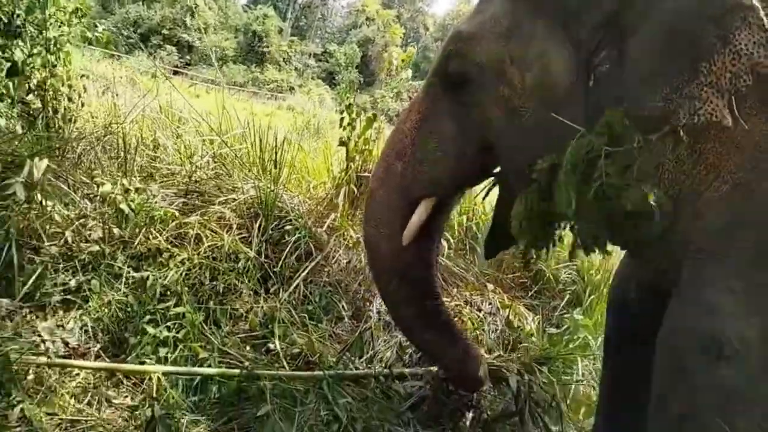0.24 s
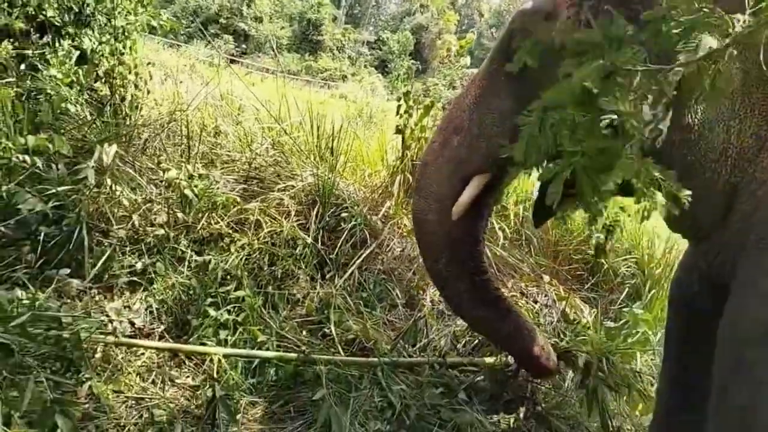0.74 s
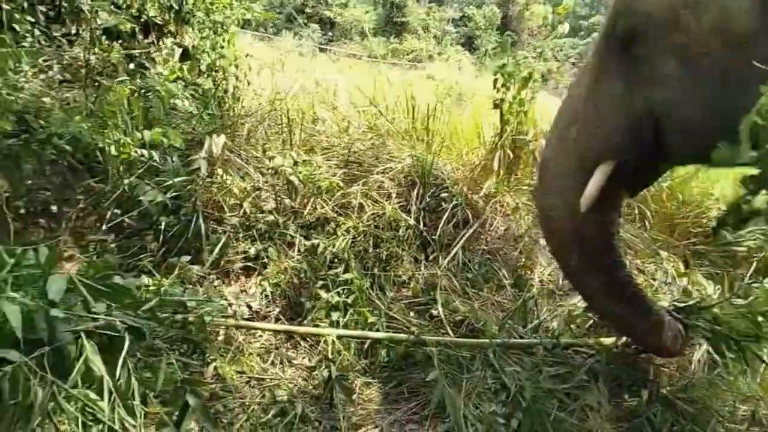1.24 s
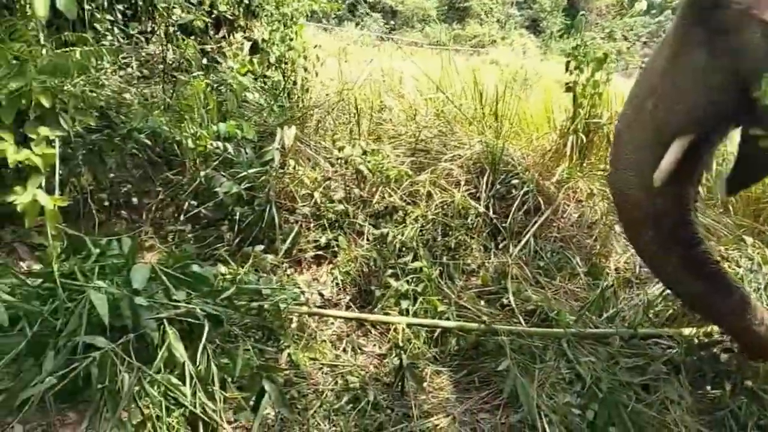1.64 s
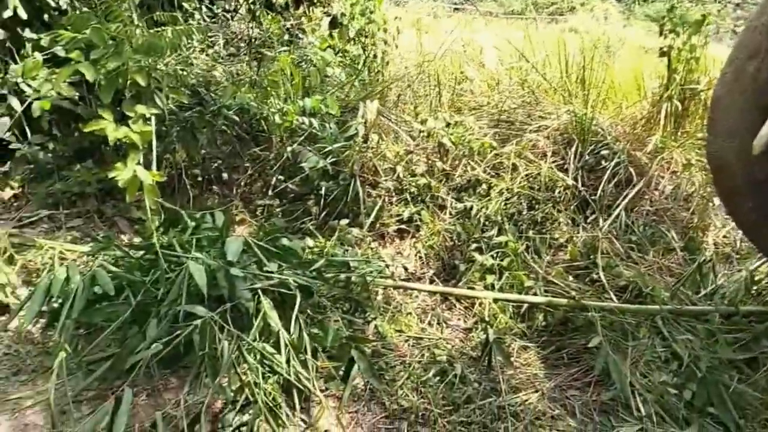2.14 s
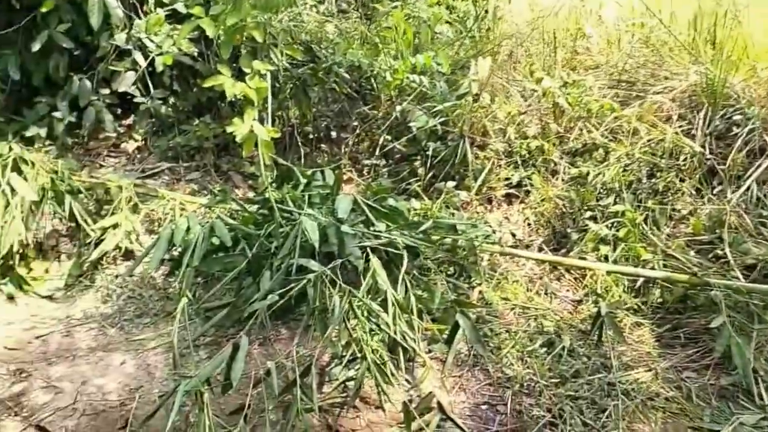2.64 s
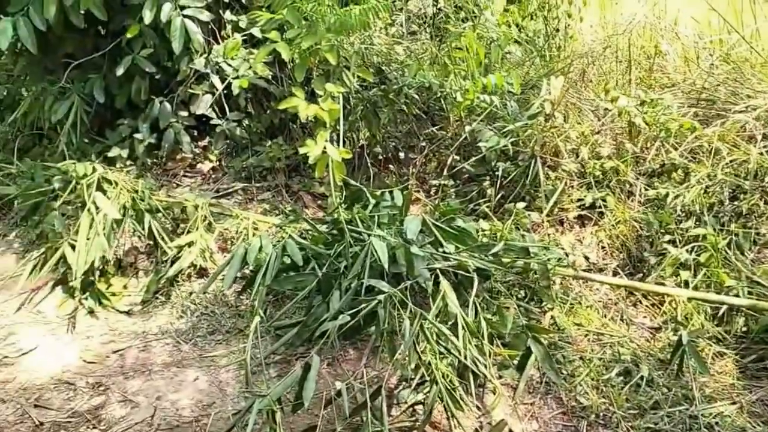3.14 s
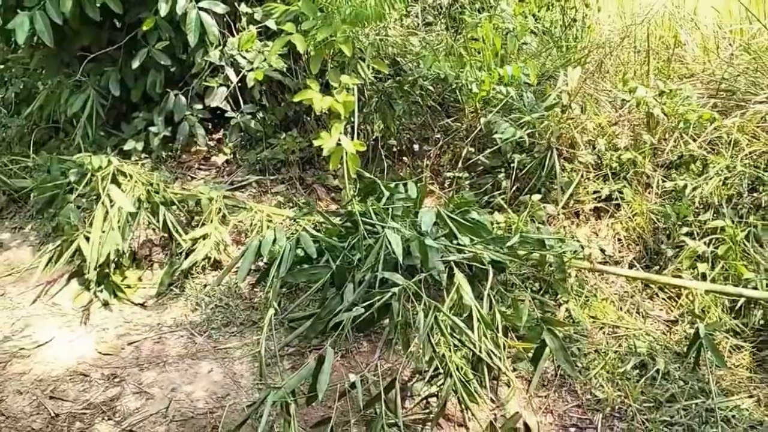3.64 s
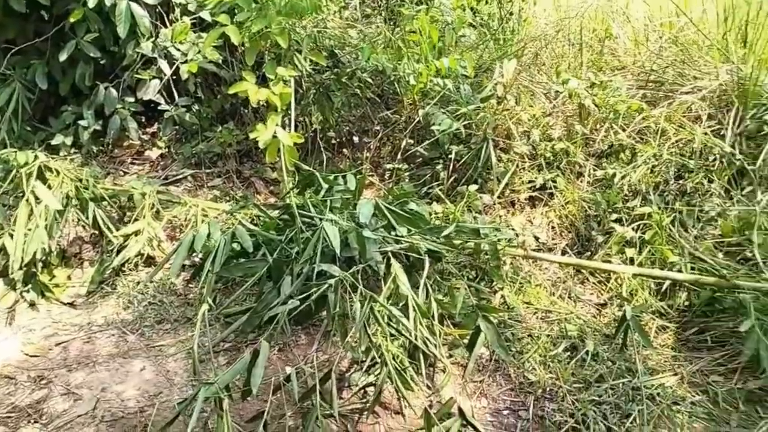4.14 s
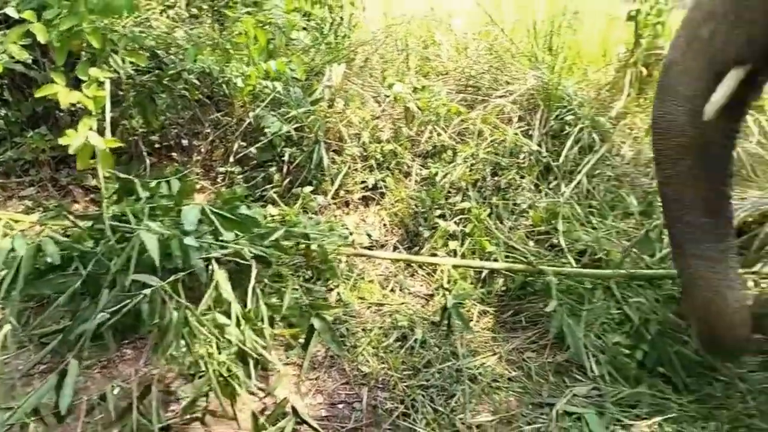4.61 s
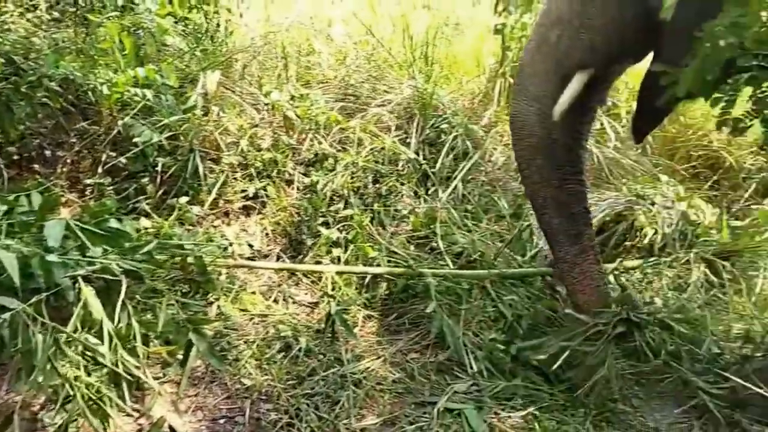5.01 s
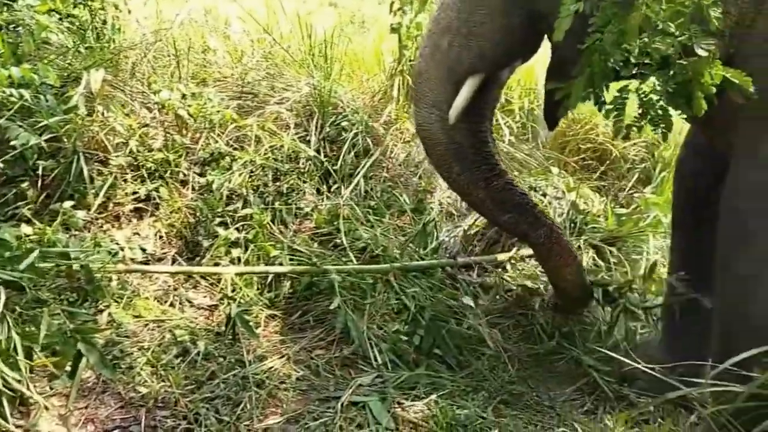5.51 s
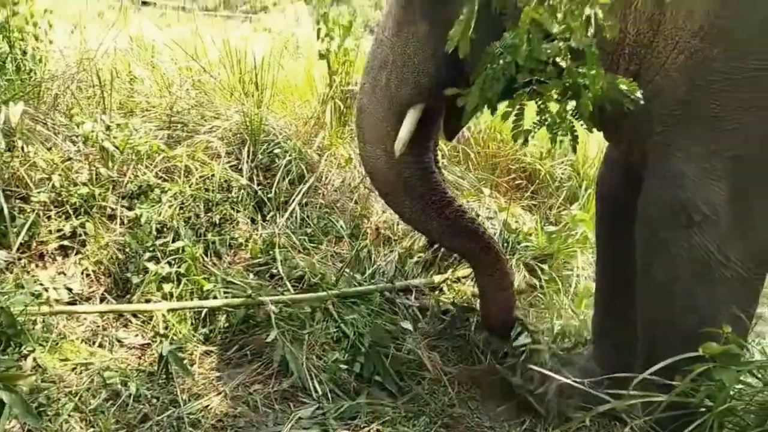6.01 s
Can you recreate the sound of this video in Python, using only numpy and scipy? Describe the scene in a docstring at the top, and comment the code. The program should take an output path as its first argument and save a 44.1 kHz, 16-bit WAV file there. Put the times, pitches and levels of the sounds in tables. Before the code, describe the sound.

From the start, dry leaves and grass rustle in short uneven tugs, crisp and grainy, wide in stereo and leaning left. At about 0.24 s a deep, hollow pop stands out, with a short dull crunch beside it; muffled crunches continue quickly until about 1.3 s, with faint low wind puffs near 0.7 and 1.4 s. Another pull comes at 1.7 s with a soft woody knock at 1.76 s. From 2 to 4 s the rustling is lighter, with a small cluster of snaps and crunches around 3 s. At 4.27 s the foliage swells with faint thin creaks, then a stem cracks at 4.5 s in two sharp, bright bursts about 20 ms apart, trailing splintery clicks and strong rustling until 4.8 s. Quieter pulls follow, with small snaps near 5.5 and 5.96 s. A faint low throb like a distant idling engine wavers underneath.

```python
"""Leafy branches and grass, dragged by an elephant a few metres off, rustle as filtered noise, clicks and crackles.
Dull crunches and a knock are noise bursts through resonances; one hollow pop is a sum of damped modes.
A stem cracks in two bursts of bright noise that ring its modes, and faint creaks are wavering sines.
A low throb like a distant idling engine is a group of overtones with rumble; low noise and puffs are the wind."""
import sys
import numpy as np
from scipy import signal
from scipy.fft import rfft, irfft, next_fast_len
from scipy.io import wavfile
from scipy.ndimage import uniform_filter1d

SR = 44100
rng = np.random.default_rng(int(sys.argv[2]) if len(sys.argv) > 2 else 0)


def put_to_file(sound):
    """Save the sound as 16-bit audio at rate SR, in the file named by the first command-line argument."""
    columns = np.atleast_2d(sound).T  # one column per channel
    safe = np.clip(columns, -1, 1)
    whole_steps = np.round(safe * 32767)
    wavfile.write(sys.argv[1], SR, whole_steps.astype(np.int16))


N = 276051
T = np.arange(N) / SR  # s
FFT_SIZE = next_fast_len(N, True)

# Spectral shape of the rustle: frequency_hz, density_db (per Hz)
LEAF_SPECTRUM = [(200, -1.5), (390, -9.5), (650, -4.5), (820, -4.5), (1050, -5.5), (2000, -1.5),
                 (2500, -3.5), (2900, -7), (3600, -3.5), (5400, -4), (6300, -9.5), (8100, -9), (8800, -15),
                 (13000, -13), (15500, -17.5)]
# Difference between the two ports: frequency_hz, left_minus_right_db
PORT_DIFFERENCE = [(200, -4.5), (700, -5), (1700, -10), (2900, -2.5), (4800, -6.5), (6300, -4.5),
                   (8000, -5.5), (10000, -3.5), (15000, -6)]
# Likeness of the rustle at the two ports: frequency_hz, correlation (0 to 1)
PORT_CORRELATION = [(200, 0.44), (600, 0.68), (1200, 0.071), (5000, 0.1), (12000, 0.026)]
# Lag of the rustle at the right port, changing as the camera pans: time_s, right_port_lag_ms
PAN_LAG = [(0, 0.083), (1, 0.16), (2, 0.31), (3.2, 0.39), (4.2, 0.49), (5, 0.14), (6.26, 0.18)]
# Pulls on the foliage: start_s, rise_s, hold_s, leaf_db, tip_db, grind_db, rub_db
PULLS = [(0, 0.1, 0.052, -49, -56, -44.5, -60), (0.198, 0.029, 0.11, -43, -48.5, -47, -59),
         (0.456, 0.035, 0.023, -44.5, -47, -57, -63), (0.59, 0.15, 0.071, -44.5, -50, -49.5, -67),
         (0.805, 0.052, .03, -45.5, -46.5, -50, -69), (0.94, 0.13, 0.24, -46.5, -50, -52.5, -64),
         (1.679, 0.026, 0.13, -44, -49.5, -47.5, -62), (1.885, 0.088, 0.2, -55, -61, -61, -86),
         (2.104, 0.12, 0.083, -45, -50, -52.5, -86), (2.522, 0.033, 0.077, -46, -51.5, -57, -63),
         (2.713, 0.04, 0.15, -54, -55, -58, -63.5), (2.92, .015, 0.085, -47.5, -48.5, -56, -58),
         (3.031, 0.021, 0.0076, -45.5, -45, -62, -52), (3.226, 0.1, 0.17, -45.5, -50, -54, -69),
         (3.57, 0.034, 0.15, -49.5, -56, -66, -91), (3.746, 0.032, 0.057, -47, -54, -56, -80),
         (4.085, 0.0033, .16, -45, -55, -54.5, -71), (4.266, 0.22, 0.029, -36.5, -46, -44, -66),
         (4.485, 0.0077, 0.068, -34, -39.5, -41, -48.5), (4.59, 0.0091, 0.087, -38, -41.5, -45, -57.5),
         (4.696, 0.029, 0.027, -40.5, -44, -52, -70), (4.763, 0.018, 0.013, -52, -57, -60, -67),
         (4.928, 0.041, 0.03, -48.5, -57, -80, -89), (5.251, 0.026, 0.11, -51.5, -51.5, -60, -60.5),
         (5.42, 0.043, 0.14, -43.5, -46.5, -61, -64), (5.673, 0.049, 0.1, -45, -49, -65, -73),
         (5.985, 0.095, .25, -46.5, -50.5, -59, -64.5)]
# The quiet bed under the pulls: time_s, leaf_db, tip_db, grind_db, rub_db
QUIET_BED = [(0, -43.5, -49.5, -57.5, -61), (1.2, -49.5, -53.5, -50, -64), (1.45, -48.5, -54, -61, -66.5),
             (2.5, -46, -53, -58.5, -69), (3.2, -48, -58, -52.5, -68.5), (4.0, -50, -57.5, -60, -72.5),
             (5, -49, -54, -63.5, -73.5), (6.26, -50, -54, -57.5, -70.5)]
RELEASE_S = 0.097
RUB_HZ, STEMS_HZ, TIPS_HZ = 504, 1360, 7300  # where the four kinds of rustle hand over
PAN_DB, PAN_SWAY_DB = 4, 1.5  # left minus right: mean and rms sway
GRAINS_PER_S, GRAIN_SCATTER_DB, GRAIN_DB = 2500, 2, -5.5  # level relative to the swish
CRACKLES_PER_S, CRACKLE_DB, CRACKLE_T60_S = 120, -13.5, 0.043  # level relative to the swish
PATCH_DB, PATCH_PER_S = 1.5, 25  # rms flicker of each slice, and its rate

# Crunches of stems in mouth and trunk:
# start_s, level_db, centre_hz, spread_octaves, fall_t60_s, left_minus_right_db
CRUNCH_EVENTS = [(.1, -38, 442, 1.1, 0.23, -3), (0.226, -39, 495, 0.83, 0.059, -24),
                 (.243, -28.5, 720, 0.12, 0.053, 7), (0.305, -37, 453, 0.64, 0.041, -1),
                 (.316, -40.5, 270, 0.55, 0.051, 3), (.485, -44, 700, 0.67, 0.15, -1),
                 (.518, -41.5, 467, 0.43, 0.11, 1), (.552, -48, 680, 0.48, 0.12, -2),
                 (.62, -48, 620, 0.42, 0.13, 0), (0.673, -45, 590, 0.78, 0.14, -1),
                 (.755, -47, 700, .3, 0.095, 6), (.8, -39, 830, 0.35, 0.082, 3),
                 (.832, -48, 690, 0.38, 0.088, 0), (.867, -49, 700, 0.38, 0.054, 0),
                 (0.892, -42.5, 420, 0.36, 0.1, -3), (.914, -45, 656, 0.54, 0.099, 0),
                 (.952, -47, 680, 0.33, 0.093, 0), (.982, -51, 700, 0.38, .08, 0),
                 (1.0, -49, 630, 0.25, 0.065, 2), (1.03, -43.5, 630, 0.25, 0.064, 3),
                 (1.072, -49, 720, 0.41, .1, 5), (1.102, -49, 740, .3, 0.084, 2),
                 (1.206, -45.5, 670, 0.79, 0.19, 2), (1.27, -45.5, 600, .4, 0.075, 0),
                 (1.75, -42, 716, 0.23, 0.1, 0), (1.695, -62, 658, 1.3, .2, 0),
                 (1.95, -45.5, 476, 0.48, 0.055, 4), (2.76, -46, 895, 0.53, 0.06, -9),
                 (2.937, -49, 800, 0.6, 0.15, -1), (3.054, -48, 600, 0.6, 0.081, -4),
                 (3.068, -41, 750, .6, 0.057, -3), (4.497, -33, 550, 0.42, 0.1, -0.5),
                 (4.52, -44, 580, 0.45, 0.091, -2), (5.278, -51.5, 870, 0.9, 0.24, -1),
                 (5.44, -49.5, 1000, 0.16, 0.32, -7), (5.494, -48, 586, 0.18, 0.05, 0),
                 (5.591, -44, 550, 0.34, 0.042, -3), (6.03, -54, 600, 0.13, 0.08, -2)]
# Resonances of the hollow: frequency_hz, width_hz (of the first of two passes), level_db
HOLLOW_RESONANCES = [(270, 150, 6.5), (349.5, 41, 0.5), (494, 160, -9), (576, 46, -1), (716, 120, -1),
                     (950, 520, -3.5), (1600, 1700, 14)]
# Resonances of the knock: frequency_hz, width_hz (of the first of two passes), level_db
KNOCK_RESONANCES = [(345, 46, 1), (497, 90, -23), (630, 44, 1.5), (750, 48, -4.5), (1360, 420, -14),
                    (1720, 170, -14), (2300, 230, -15)]
CRUNCH_RISE = 0.087  # rise time as a share of the fall
KNOCK_S, KNOCK_DB, KNOCK_RISE_S, KNOCK_T60_S = 1.76, -28.5, 0.027, 0.16

# Modes of the popped cavity: frequency_hz, level_db, decay_t60_s
CAVITY_MODES = [(204, 1, 0.1), (370, -8, 0.032), (495, -12, 0.08), (735, -10.5, 0.051)]
POP_S, POP_DB, POP_PUSH_S = 0.2411, -7, 0.0088
POP_LAG_S, POP_SETTLE_S = 0.00154, 0.012  # final delay of the loaded ring, and its time constant
POP_LOW_HZ = 45

# Fibres of the stem giving way: start_s, level_db, brightness_hz, left_minus_right_db, decay_t60_s
FIBRE_SNAPS = [(.491, -33, 1180, -3, .03), (.685, -39, 1060, -5, .025), (.805, -38, 1040, 0, .025),
               (1.215, -34.5, 950, -3, .03), (2.941, -38, 950, -6, .025), (2.945, -39, 2045, 4, .03),
               (2.995, -35, 2100, -2, .05), (3.014, -33, 2050, -6, 0.042), (3.049, -33, 2400, 0, .03),
               (3.065, -34, 2090, -3, 0.027), (3.076, -34, 2300, -7, .03), (4.089, -34, 3020, -13, 0.026),
               (4.495, -26, 3500, -4, 0.027), (4.497, -12, 2120, -7.5, 0.009),
               (4.5012, -12, 2030, -6, 0.012), (4.5008, -16, 4000, -5, .01), (4.5024, -19, 2120, -3, 0.011),
               (4.5035, -14, 4010, -5, 0.017), (4.5041, -22, 7100, -5, 0.017),
               (4.5062, -17, 2000, -10, 0.012), (4.5166, -20, 11000, -8, 0.089),
               (4.5185, -18, 4500, -13, .03), (4.5213, -11.5, 4800, -1, 0.027),
               (4.5212, -15, 12700, 4, 0.13), (4.523, -16, 2300, 9, 0.023), (4.5275, -21, 3600, -8, 0.022),
               (4.5398, -27, 4000, -5, .015), (4.543, -26, 2220, -5, .02), (4.5519, -32, 1950, -9, 0.022),
               (4.5649, -31, 3750, -6, 0.015), (4.5794, -25, 1600, -6, 0.017), (4.59, -30, 1340, -3, .02),
               (4.604, -34, 2000, -3, .02), (4.66, -32, 2000, -7, .03), (4.713, -33, 1900, -3, .025),
               (5.445, -43, 950, 1, 0.045), (5.496, -28.5, 1500, -6, 0.025), (5.528, -30, 2050, -2, 0.03),
               (5.536, -40, 1200, -2, 0.043), (5.555, -44, 1300, 1, .03), (5.964, -37.5, 2200, 0, 0.04)]
# Modes of the stem, levels relative to one another: frequency_hz, level_db, decay_t60_s
STEM_RESONANCES = [(566, -27, 0.05), (1215, -10, 0.17), (2133, 7.5, 0.026), (4070, 5, 0.017),
                   (5480, -2, 0.013)]
STEM_RING_DB = -8  # peak relative to the crack
SNAP_LAG_S, SNAP_WIDTH = 0.00017, 0.8  # width of the first pass as a share of the brightness

# Thin creaks of bent stems: start_s, level_db, pitch_hz, length_s, left_minus_right_db, flutter_db
STEM_CREAKS = [(4.282, -47.5, 1870, 0.051, -16, 1.5), (4.39, -48, 735, 0.031, -5, 5),
               (5.833, -56.5, 715, 0.153, -10, 4.5)]

# Level of the low throb: time_s, level_db
THROB_LEVEL = [(0, -56), (.19, -51), (0.36, -53), (0.69, -48.5), (0.77, -56.5), (0.95, -47.5), (1.03, -57),
               (1.15, -53), (1.46, -48.5), (1.69, -55), (1.8, -49), (2.28, -60), (2.53, -53.5), (3.42, -56),
               (3.43, -58.5), (4.09, -60.5), (4.2, -48.5), (4.29, -58), (4.58, -55), (4.65, -59),
               (4.71, -50.5), (4.75, -68), (5.26, -66.5), (5.31, -57), (5.9, -64.5), (6.26, -55.5)]
# Beat rate of the throb: time_s, rate_hz
THROB_BEAT = [(0, 21.55), (.35, 22.07), (.54, 22.53), (1.25, 23.21), (1.74, 22.9), (2.04, 23.6),
              (2.54, 23.8), (2.94, 24.2), (4.04, 24.03), (4.2, 23.96), (4.39, 22.93), (4.9, 23.1),
              (5.21, 25.2), (5.51, 24.2), (6.26, 24.8)]
# The throb's loudest region: time_s, centre_hz
THROB_REGION = [(0, 125), (.6, 120), (1.0, 125), (1.4, 136), (1.8, 120), (2.1, 136), (2.7, 138.5),
                (3.2, 124), (3.8, 123), (4.15, 140), (4.5, 127), (5.0, 142), (5.4, 110), (5.8, 126),
                (6.26, 134.9)]
THROB_SPREAD_HZ, THROB_WAVER = 26, 0.0041  # width of the region; rms share of the beat rate
THROB_FLICKER_DB, THROB_RUMBLE_DB = 2.5, -7  # rms flicker; rumble relative to the tones

# Mean level of the breeze: time_s, level_db
BREEZE_LEVEL = [(0.36, -64), (0.72, -44.5), (1.02, -65), (1.41, -56), (2.33, -65), (2.79, -56.5),
                (3.28, -65.5), (5.27, -65.5), (6.26, -63)]
# Wind puffs on the ports: start_s, peak_db, pitch_hz, left_minus_right_db, length_s
WIND_PUFFS = [(0.649, -31.5, 51.3, -32, 0.046), (0.713, -38, 86, -26, 0.035),
              (1.421, -33, 49.1, -29, 0.034), (2.519, -46.5, 90.3, -11, 0.041),
              (2.85, -42, 37.64, 21, 0.043), (6, -50, 37.1, -17, 0.038)]

LOW_CUT_HZ, TOP_HZ = 30, 15550


def undb(db):
    """Amplitude is ten to the power of a twentieth of the level."""
    return 10 ** (np.asarray(db) / 20)


def unit(x):
    """Normalisation to an rms of one."""
    return x / np.sqrt(np.mean(x ** 2))


def at_times(table):
    """Linear interpolation of a (time, value) table at every sample."""
    return np.interp(T, *np.transpose(table))


def along(table, hz):
    """Interpolation of a (frequency, value) table on a logarithmic frequency axis."""
    f, value = np.transpose(table)
    return np.interp(np.log(hz + 1), np.log(f), value)


def ears(pan_db):
    """Level difference between the ports: left and right gains that sum to two."""
    gains = undb(np.array([np.minimum(pan_db, 0), np.minimum(-pan_db, 0)]))
    return gains * 2 / (1 + undb(-np.abs(pan_db)))


def resonate(x, hz, width_hz):
    """Two-pole resonance with unit gain at the centre."""
    return signal.lfilter(*signal.iirpeak(hz, hz / width_hz, SR), x)


def ring(modes, seconds):
    """Modal superposition: a sum of exponentially damped sines."""
    t = T[:int(seconds * SR)]
    return sum(undb(db - 60 * t / t60) * np.sin(2 * np.pi * hz * t) for hz, db, t60 in modes)


def add(out, start_s, sound):
    """Linear superposition of a sound from its starting time."""
    i = int(start_s * SR)
    out[:, i:i + sound.shape[-1]] += sound[..., :N - i]


def walk(rate):
    """Slow random modulation: levels drawn at a rate, joined by slopes, with an rms of one."""
    k = int(SR / rate)
    steps = np.repeat(rng.standard_normal(N // k + 1), k)
    return unit(uniform_filter1d(steps, k)[:N])


def back(spectrum):
    """Inverse Fourier transform, from spectrum to sound."""
    return irfft(spectrum, FFT_SIZE)[..., :N]


def foliage():
    """Noise textures: leaf ticks and crackles over a soft swish, split into four bands with their own swells."""
    leaf_db, tip_db, grind_db, rub_db = effort()
    pan_db = PAN_DB + PAN_SWAY_DB * walk(12)
    swish = rng.standard_normal((3, N))
    ticks = undb(GRAIN_DB) * unit(scatter(GRAINS_PER_S))
    near, *own = swish + ticks + undb(CRACKLE_DB) * crackles()
    late = np.interp(T - at_times(PAN_LAG) / 1000, T, near)

    hz = np.fft.rfftfreq(FFT_SIZE, 1 / SR)
    alike = np.clip(along(PORT_CORRELATION, hz), 0, 1)
    shared = rfft(np.array([near, late]), FFT_SIZE)
    separate = rfft(np.array(own), FFT_SIZE)
    both = np.sqrt(alike) * shared + np.sqrt(1 - alike) * separate
    port_db = along(PORT_DIFFERENCE, hz) / 2
    both = both * undb(along(LEAF_SPECTRUM, hz) + np.array([port_db, -port_db]))
    both = both / (1 + (190 / (hz + 1)) ** 6)  # leaves have no bass

    # Each low-pass share includes those below it, so differences give the bands
    rub, low, mid = (1 / (1 + (hz / edge) ** 12) for edge in (RUB_HZ, STEMS_HZ, TIPS_HZ))
    jolts_db = 0.54 * walk(19)  # leaves and tips are shaken together
    kinds = [
        (back(both * rub), rub_db + 3.14 * walk(19)),
        (back(both * (low - rub)), grind_db + 2.66 * walk(18)),
        (patches(both * (mid - low), hz), leaf_db + jolts_db),
        (patches(both * (1 - mid), hz), tip_db + jolts_db),
    ]
    return ears(pan_db) * sum(unit(sound) * undb(db) for sound, db in kinds)


def effort():
    """Addition of powers: each pull rises, holds and lets go over a quiet bed; gives four levels in dB."""
    s, *bed = np.transpose(QUIET_BED)
    power = undb(2 * np.array([np.interp(T, s, db) for db in bed]))
    for start_s, rise, hold, *db in PULLS:
        t = T[:int((rise + hold + RELEASE_S) * SR)]
        shape = np.clip(t / rise, 0, 1) * np.clip(1 - (t - rise - hold) / RELEASE_S, 0, 1)
        add(power, start_s, undb(2 * np.array(db))[:, None] * shape ** 2)
    return 10 * np.log10(power)


def scatter(per_s):
    """Random impulses, a few of them much bigger; one row shared and one for each port."""
    chance, sign, size = rng.random((3, 3, N))
    clicks = (chance < per_s / SR) * np.sign(sign - .5)
    return clicks * undb(-GRAIN_SCATTER_DB * np.log(size + 1e-9))


def crackles():
    """Exponential decay: small stalks break as clicks, each a short tail of noise."""
    fade = np.exp(-np.log(1000) / (CRACKLE_T60_S * SR))  # decay per sample
    tails = signal.lfilter([1], [1, -fade], np.abs(scatter(CRACKLES_PER_S)))
    return unit(tails * rng.standard_normal((3, N)))


def patches(spectrum, hz):
    """Independent band modulation: leaves of each size stir on their own in fifth-octave slices."""
    slice_of = np.floor(5 * np.log2(hz + 1))
    return sum(back(spectrum * (slice_of == k)) * undb(PATCH_DB * walk(PATCH_PER_S))
               for k in np.unique(slice_of[hz > 700]))


def crunches():
    """Resonant filtering: each crunch favours the hollow's resonances near its centre; one knock is added."""
    out = np.zeros((2, N))
    knock_body = [(f, w, undb(db)) for f, w, db in KNOCK_RESONANCES]
    knock = burst(knock_body, KNOCK_RISE_S, KNOCK_T60_S)
    add(out, KNOCK_S, undb(KNOCK_DB) * ears(2.0)[:, None] * knock)
    for start_s, db, hz, spread, t60, pan_db in CRUNCH_EVENTS:
        body = [(f, w, undb(g) * np.exp(-.5 * (np.log2(f / hz) / spread) ** 2))
                for f, w, g in HOLLOW_RESONANCES]
        crunch = burst(body, CRUNCH_RISE * t60, t60)
        add(out, start_s, undb(db) * ears(pan_db)[:, None] * crunch)
    return out


def burst(body, rise, t60):
    """Noise through parallel (Hz, width Hz, gain) resonances under a smooth rise and exponential decay."""
    size, settle = SR // 4, SR // 20
    t, noise = T[:size], rng.standard_normal((len(body), size + settle))
    tone = sum(g * unit(resonate(resonate(n, f, w), f, 2 * w)) for (f, w, g), n in zip(body, noise))
    tone = tone[settle:]  # the filters have settled
    swell = np.sin(np.pi / 2 * np.minimum(t / rise, 1)) ** 2
    swell = swell * undb(-60 * np.maximum(t - rise, 0) / t60)
    return unit(tone * swell) * np.sqrt(np.mean(swell ** 2))


def pop():
    """Modes of a struck cavity: the push takes milliseconds, and the pitch starts low under the load."""
    out, t = np.zeros((2, N)), T[:SR // 4]
    loaded = t - POP_LAG_S * (1 - np.exp(-t / POP_SETTLE_S))
    sound = np.interp(loaded, t, ring(CAVITY_MODES, .25))
    push = np.minimum(t / POP_PUSH_S, 1) ** 0.6
    add(out, POP_S, -undb(POP_DB) * sound * push)
    return signal.sosfilt(signal.butter(2, POP_LOW_HZ, "high", fs=SR, output="sos"), out)


def snaps():
    """Impulsive excitation: each tear is a bright crack that rings the stem and reaches the left port first."""
    out, stem = np.zeros((2, N)), ring(STEM_RESONANCES, .08)
    size = SR // 10
    noises = rng.standard_normal((len(FIBRE_SNAPS), 3, size))  # one shared row, one for each port
    for (start_s, db, hz, pan_db, t60), noise in zip(FIBRE_SNAPS, noises):
        noise[0, 0] = 26  # the first fibre goes with a sharp tick
        tear = (noise[0] + 3.25 * noise[1:]) * undb(-60 * T[:size] / t60)
        crack = resonate(resonate(tear, hz, SNAP_WIDTH * hz), hz, 1.0 * hz)
        rung = signal.fftconvolve(tear, stem[None])[:, :size]
        sound = crack / np.abs(crack).max() + undb(STEM_RING_DB) * rung / np.abs(rung).max()
        add(out, start_s, undb(db) * ears(pan_db)[:, None] * sound)
    out[1] = np.roll(out[1], int(SNAP_LAG_S * SR))
    return out


def creaks():
    """Phase and amplitude modulation: faint sines waver in pitch and flutter in level."""
    out = np.zeros((2, N))
    for start_s, db, hz, length, pan_db, flutter_db in STEM_CREAKS:
        t = T[:int(length * SR)]
        waver = 3.7 * walk(25.3)[:len(t)] + 0.25 * flutter_db * walk(88)[:len(t)]  # radians
        flutter = undb(flutter_db * walk(76)[:len(t)])
        envelope = np.sin(np.pi * t / length) ** 0.21 * flutter
        tone = np.sin(2 * np.pi * hz * t + waver)
        add(out, start_s, undb(db) * ears(pan_db)[:, None] * envelope * tone)
    return out


def throb():
    """Beating of harmonics: overtones 3 to 8 of a slow beat, each flickering a little, with rumble between."""
    rate = at_times(THROB_BEAT) * (1 + THROB_WAVER * walk(5.9))
    turns = np.cumsum(rate) / SR
    centre, rate = at_times(THROB_REGION), np.gradient(turns) * SR
    tones = np.zeros(N)
    for k in range(3, 9):
        weight = np.exp(-.5 * ((k * rate - centre) / THROB_SPREAD_HZ) ** 2)
        flicker = undb(THROB_FLICKER_DB * walk(7))
        tones += weight * flicker * np.sin(2 * np.pi * k * turns + 0.5 * walk(4))
    rumble = resonate(resonate(rng.standard_normal(N), 132, 67), 133, 86)
    mix = unit(unit(tones) + undb(THROB_RUMBLE_DB) * unit(rumble))
    return mix * undb(at_times(THROB_LEVEL))


def wind():
    """Slow pressure swings: low noise, unrelated on the two ports, is a faint breeze; short pulses are puffs."""
    breeze = unit(resonate(resonate(rng.standard_normal((2, N)), 46, 82), 59, 83))
    out = breeze * undb(at_times(BREEZE_LEVEL) + 1.9 * walk(5.2))
    for start_s, db, hz, pan_db, length in WIND_PUFFS:
        t = T[:int(length * SR)]
        swing = np.sin(np.pi * t / length) ** 2 * np.cos(2 * np.pi * hz * (t - length / 2))
        add(out, start_s, undb(db) * ears(pan_db)[:, None] * swing)
    return out


def scene():
    """Linear superposition of all the sources."""
    return foliage() + crunches() + pop() + snaps() + creaks() + throb() + wind()


def record(dry):
    """Band limiting: the microphone loses the deepest bass and the recorder cuts the top steeply."""
    thin = signal.sosfilt(signal.butter(2, LOW_CUT_HZ, "high", fs=SR, output="sos"), dry)
    return signal.sosfilt(signal.ellip(10, .2, 80, TOP_HZ, fs=SR, output="sos"), thin)


dry = scene()
out = record(dry)
put_to_file(out)
```